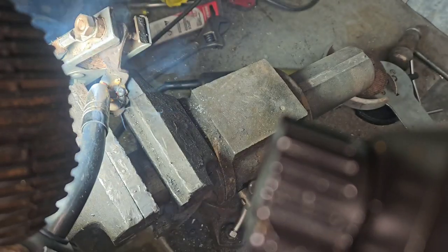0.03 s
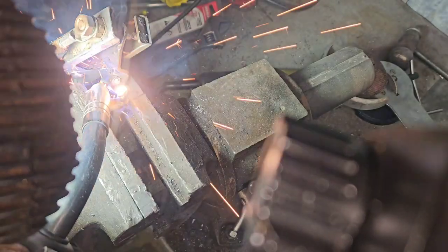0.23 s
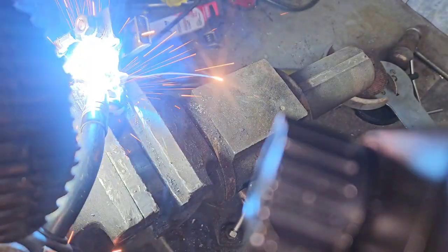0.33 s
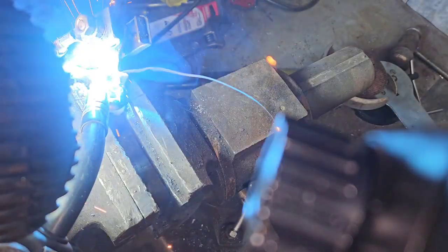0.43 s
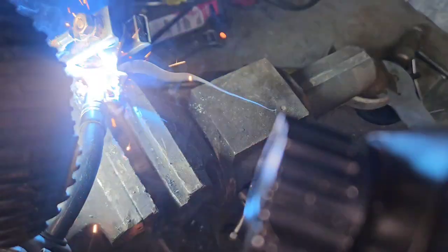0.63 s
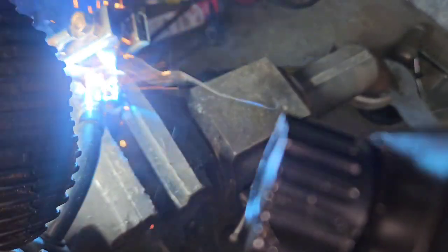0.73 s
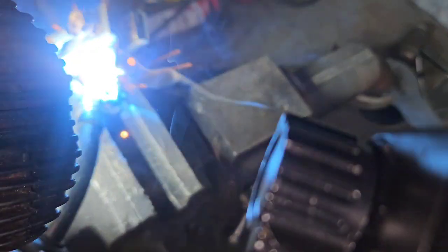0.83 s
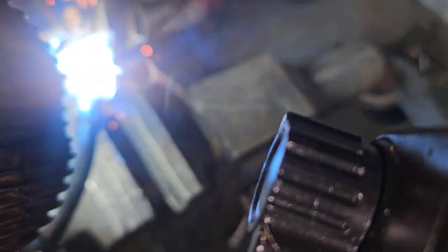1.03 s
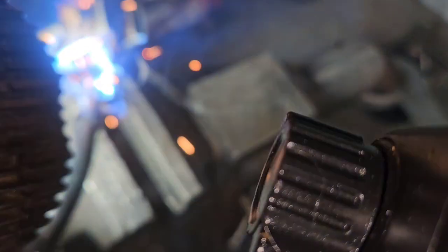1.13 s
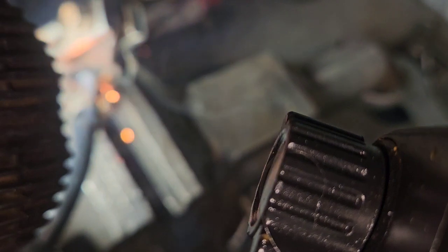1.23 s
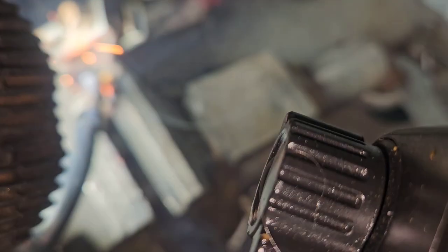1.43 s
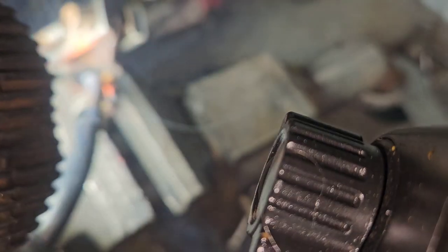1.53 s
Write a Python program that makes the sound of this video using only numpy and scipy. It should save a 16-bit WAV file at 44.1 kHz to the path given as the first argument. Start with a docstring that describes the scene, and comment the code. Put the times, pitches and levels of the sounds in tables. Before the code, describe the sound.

A short electric weld is heard close up, slightly to the left. A fan hums alone, then gas hisses and the arc strikes with sharp cracks at 0.2 seconds. From 0.3 seconds it holds a harsh, crackling buzz with sizzling metal and a few soft thumps on the microphone. Near 1.1 seconds it sputters out, and the gas keeps hissing over the fan.

```python
"""A short wire-feed weld on a metal workbench, microphone close in, the arc a little to the left.
A cooling fan runs alone, then shielding gas starts to hiss. At 0.2 s the arc strikes with stray cracks
and settles into a buzz, the wire shorting and burning back about a hundred times a second. Molten metal
sizzles between the pops, droplets knock, and the hardest bursts thump the microphone.
Near 1.1 s the arc sputters out, and the gas hisses on over the fan."""
import sys
import numpy as np
from scipy import signal
from scipy.fft import rfft, irfft
from scipy.io import wavfile
from scipy.ndimage import uniform_filter1d

SR = 44100
rng = np.random.default_rng(int(sys.argv[2]) if len(sys.argv) > 2 else 0)


def wav_record(signal):
    """Record a signal, one row per channel, as 16-bit PCM in the file named by sys.argv[1]."""
    frames = np.transpose(np.atleast_2d(signal))
    bounded = np.clip(frames, -1, 1)
    # unit amplitude maps onto the largest positive 16-bit level
    quanta = np.round(bounded * 32767).astype(np.int16)
    wavfile.write(sys.argv[1], SR, quanta)


N = 70560


def arc():
    """Each short circuit ends in a snap and a ragged spray of noise; steady pops add a puff of air."""
    # Stray cracks as the arc strikes and dies: t/s, level/dB, spray relative to the crack/dB
    cracks = [(0.2066, 1.5, 2.5), (0.2096, -12, 5), (0.2644, 1.5, 4.5), (.2876, -2.5, 11.5),
              (0.2949, 3, -6), (.3123, -1.5, 8), (.316, -5, -2), (0.3183, 0, 4), (1.0467, 1.5, -2),
              (1.0508, -3, -4), (1.0602, -1.5, -21), (1.0679, 3, -8), (1.0805, 2.5, 2), (1.0916, -0.5, -3),
              (1.103, -4, 7.5), (1.1216, -5, 2)]
    spray_db, spray_s, spray_low_hz = -4, 0.0014, 424
    puff_db, puff_s = -45, 0.0015
    pop_times, pop_db, puff_sizes = pops()
    crack_times, crack_db, extra_db = np.transpose(cracks)
    t = np.arange(N) / SR
    buzz = clicks(pop_times, amp(pop_db))
    snaps = buzz + clicks(crack_times, amp(crack_db))
    spray_starts = buzz + clicks(crack_times, amp(crack_db + extra_db))
    fade = np.exp(-t / spray_s)
    spray = convolve(spray_starts, fade / np.linalg.norm(fade))[0] * rng.standard_normal(N)
    spray = signal.lfilter(*signal.butter(1, spray_low_hz, "high", fs=SR), spray)
    puff_shape = (1 - t / puff_s) * np.exp(-t / puff_s)
    puffs = convolve(clicks(pop_times, puff_sizes), puff_shape)[0]
    return lag_treble(snaps + amp(spray_db) * spray) + amp(puff_db) * puffs


def pops():
    """Times, levels and puff sizes of the steady pops: one per short circuit, never quite regular."""
    # Wire shorting and burning back: t/s, rate/Hz
    pop_rate = [(0.3247, 123.4), (0.3552, 118.8), (0.4109, 90.5), (0.4956, 98.6), (0.533, 108.7),
                (0.6188, 99.2), (0.6503, 99.7), (0.6704, 105.0), (0.7355, 92.4), (0.8341, 90.2),
                (0.8717, 93.0), (0.9558, 88.7), (0.9759, 97.6), (1.044, 94.1)]
    # Strength of the pops: t/s, level/dB
    pop_level = [(.325, 0), (.39, 2.5), (.49, -.5), (.6, 1), (.7, -1.5), (.84, 0), (.89, 2.5), (.955, -1),
                 (.98, 2), (1.01, -4.5), (1.04, 1.5)]
    spread_db, jitter_s = 0.26, .00015
    when, rate = np.transpose(pop_rate)
    t = np.arange(when[0], when[-1], 1 / SR)
    cycles = np.cumsum(np.interp(t, when, rate)) / SR
    times = np.interp(np.arange(cycles[-1]), cycles, t)
    spread, jitter, puff_sizes = rng.standard_normal((200, 3))[:len(times)].T
    level_db = np.interp(times, *np.transpose(pop_level)) + spread_db * spread
    return times + jitter_s * jitter, level_db, puff_sizes


def lag_treble(x, lag_s=0.0002745, from_hz=5860):
    """The bright ring of a snap arrives just after its first push."""
    hz = np.fft.rfftfreq(N, 1 / SR)
    delay = lag_s * (1 - 1 / (1 + (hz / from_hz) ** 6))
    phase = 2 * np.pi * np.cumsum(delay) * SR / N
    return irfft(rfft(x) * np.exp(-1j * phase), N)


def knocks():
    """Larger droplets burst with a hollow knock, ringing for a cycle or two."""
    # Bursting droplets: t/s, level/dB, f/Hz, decay/s
    droplets = [(0.318, -26, 640, 0.0038), (0.4052, -9, 1540, 0.00035), (0.4174, -25, 250, 0.0014),
                (0.5288, -20, 600, 0.00077), (0.6055, -21, 510, 0.00091), (0.7566, -16, 1730, 0.00037),
                (0.89, -29, 1700, 0.00036), (1.1028, -13.5, 765, 0.00071)]
    out = np.zeros(N)
    for start, db, hz, decay in droplets:
        t = np.maximum(np.arange(N) / SR - start, 0)
        out += amp(db) * np.sin(2 * np.pi * hz * t) * np.exp(-t / decay)
    return out


def sizzle(bursts_per_s=14000, spread_db=2):
    """Thousands of tiny bursts a second from the molten pool and its sparks."""
    # Strength of the sizzle: t/s, level/dB
    pool_level = [(.186, -71), (.193, -38), (.205, -24), (.212, -25), (.25, -32.5), (.30, -25.5),
                  (.33, -25.5), (.45, -28.5), (.72, -30.5), (.855, -33), (.885, -26), (.97, -31.5),
                  (1.085, -29.5), (1.122, -37), (1.135, -63)]
    sizes = amp(spread_db * np.minimum(rng.exponential(1, N), 3))
    grains = sizes * rng.standard_normal(N) * (rng.random(N) < bursts_per_s / SR)
    return amp(curve(pool_level)) * grains / grains.std()


def thumps(damping=0.41):
    """A brief push of air on the microphone, followed by a slow rebound."""
    # The hardest bursts: t/s, left/dB, right/dB, push length/s, rebound f/Hz
    bursts = [(0.21, -34, -18.5, 0.0017, 30), (0.2284, -29, -30, 0.005, 22), (0.2957, -27, -35, .001, 50),
              (0.735, -39, -19.5, 0.00082, 55), (0.7582, -30, -16, 0.00052, 56),
              (0.7806, -35, -21, 0.00041, 55), (0.802, -36, -21, 0.001, 55),
              (0.8895, -38, -11.5, 0.00066, 54.5), (0.9011, -21, -25, 0.00055, 55),
              (1.0805, -17, -9, 0.00066, 55.4), (1.0942, -14.5, -21.5, 0.00036, 56),
              (1.103, -36, -1.5, 0.00042, 51.6)]
    out = np.zeros((2, N))
    for start, left_db, right_db, length, rebound_hz in bursts:
        age = np.maximum(np.arange(N) / SR - start, 0) / length
        push = 2 * age ** 2 * np.exp(-age)
        omega = 2 * np.pi * rebound_hz
        rebound = signal.bilinear([1, 0, 0], [1, 2 * damping * omega, omega ** 2], SR)
        out -= amp([[left_db], [right_db]]) * signal.lfilter(*rebound, push)
    return out


def workshop(room_db=-7, room_delay_s=0.0091):
    """From weld to microphone: direct sound, echoes off nearby metal, the room's tail, ringing parts."""
    # Reverberation of the workshop: f/Hz, T60/s
    room_t60 = [(100, 0.11), (1000, 0.11), (2200, 0.15), (5000, 0.34), (9000, 0.33), (13000, 0.25)]
    # Colour of all the echoes: f/Hz, level/dB
    echo_colour = [(60, 0), (400, -11), (1200, -10.5), (2000, 3), (4500, 2), (8500, -10.5), (13000, -3),
                   (16000, -17)]
    # Metal parts ringing with the pops: f/Hz, level/dB, T60/s
    parts = [(1530, -41.5, 0.063), (1846, -40, 0.08), (3186, -47, 0.059), (4760, -47.5, 0.043),
             (4870, -45, 0.046)]
    t = np.arange(SR // 2) / SR
    hz, frame_s, spectra = signal.stft(rng.standard_normal((2, len(t))), SR, nperseg=256)
    spectra *= np.exp(-np.log(1000) * frame_s / read(room_t60, hz)[:, None])
    tail = signal.istft(spectra, SR, nperseg=256)[1][:, :len(t)] * (t > room_delay_s)
    clamps = scatter(delay_s=.0003, fade_s=0.09, left_db=-7.5, right_db=-13.5)
    bench = scatter(delay_s=.0032, fade_s=0.02, left_db=-8, right_db=-8.5)
    echoes = clamps + bench + amp(room_db) * tail / np.linalg.norm(tail[0])
    echo_gain = amp(read(echo_colour, np.fft.rfftfreq(len(t), 1 / SR)))
    path = irfft(rfft(echoes) * echo_gain, len(t))
    path[:, 0] += 1  # direct sound
    for f, db, t60 in parts:
        path += amp(db) * np.exp(-np.log(1000) * t / t60) * np.cos(2 * np.pi * f * t)
    return path


def scatter(delay_s, fade_s, left_db, right_db):
    """A dense cluster of early echoes off metal near the weld."""
    t = np.arange(SR // 2) / SR - delay_s
    taps = rng.choice([-1., 1.], (2, len(t))) * (t > 0) * np.exp(-abs(t) / fade_s)
    return amp([[left_db], [right_db]]) * taps / np.linalg.norm(taps, axis=1, keepdims=True)


def gas(start_s=0.173, rise_s=0.023):
    """Shielding gas leaves the nozzle just before the strike and keeps flowing after the arc."""
    # Hiss of the nozzle: f/Hz, left/dB, right/dB
    hiss_colour = [(500, -64, -64), (1310, -49, -53), (1950, -36, -34), (2500, -46, -46.5),
                   (4600, -45.5, -41.5), (5140, -37, -43), (6300, -36, -47), (7540, -37.5, -46),
                   (8800, -37, -47), (9400, -51, -66), (12100, -49, -53), (13600, -39, -43),
                   (15500, -46, -50)]
    flow = np.clip((np.arange(N) / SR - start_s) / rise_s, 0, 1)
    return colour(rng.standard_normal((2, N)), hiss_colour) * flow


def fan(waver_depth=0.0058, mono_below_hz=680):
    """The cooling fan behind it all: rushing air, centred in the bass, and a few wavering tones."""
    # Rush of air: f/Hz, left/dB, right/dB
    air_colour = [(19.8, -56, -17), (60, -26.5, -24.5), (131, -32.5, -28), (240, -23, -25.5),
                  (432, -31.5, -32), (558, -24.5, -23), (694, -36, -40.5), (1170, -39.5, -39),
                  (2500, -47, -47), (4800, -52, -46.5), (5700, -59, -59), (8360, -54, -68),
                  (9800, -94, -84), (13000, -75, -67), (16000, -86, -68)]
    # Hum of the fan: f/Hz, level/dB
    tones = [(91.5, -54), (215.3, -52.5), (463, -55), (511.4, -48.5)]
    # A little quieter from the strike onwards: t/s, level/dB
    fan_level = [(.19, 0.5), (.22, -3.5)]
    left, unrelated = rfft(rng.standard_normal((2, N)))
    coherence = 1 / (1 + (np.fft.rfftfreq(N, 1 / SR) / mono_below_hz) ** 2)
    right = coherence * left + np.sqrt(1 - coherence ** 2) * unrelated
    air = colour(irfft([left, right], N), air_colour)
    waver = uniform_filter1d(rng.standard_normal(N), size=3000)
    clock = np.cumsum(1 + waver_depth * waver / waver.std()) / SR
    hum = sum(np.sqrt(2) * amp(db) * np.sin(2 * np.pi * (hz * clock + rng.random())) for hz, db in tones)
    return amp(curve(fan_level)) * (air + hum)


def amp(db):
    """Decibels to gain."""
    return 10 ** (np.asarray(db) / 20)


def curve(points):
    """A control curve at every sample."""
    return np.interp(np.arange(N) / SR, *np.transpose(points))


def read(points, hz, column=1):
    """One column of a spectrum table on a log-frequency axis."""
    table = np.transpose(points)
    return np.interp(np.log(hz + 1), np.log(table[0]), table[column])


def clicks(times, sizes):
    """A train of single-sample clicks."""
    return np.bincount(np.round(times * SR).astype(int), sizes, N)[:N]


def convolve(x, response):
    """Convolution along time, cut to the scene's length."""
    return signal.fftconvolve(np.atleast_2d(x), np.atleast_2d(response), axes=1)[:, :N]


def colour(x, table):
    """Minimum-phase filter with a left and a right spectrum."""
    hz = abs(np.fft.fftfreq(4096, 1 / SR))
    log_gain = np.log(amp([read(table, hz, column=1), read(table, hz, column=2)]))
    spectrum = np.exp(np.conj(signal.hilbert(log_gain)))
    return convolve(x, np.fft.ifft(spectrum).real)


def scene():
    """Close to the bench; the arc lies a little to the left, so it reaches the right channel later."""
    # Colour of one snap at the microphone: f/Hz, left/dB, right/dB
    snap_colour = [(25, -22.5, -21), (86, 8.5, 9), (210, 10, 8), (475, 1, -1.5), (585, 2.5, 8),
                   (1170, 5, 0), (1900, 0, 3), (2400, -7, 3), (3570, 1, 1.5), (4900, -6.5, 3),
                   (5330, 5, -6.5), (7020, 4.5, 0.5), (7140, 12, 5), (8670, 13.5, 8), (9650, 3, -23),
                   (11280, -4.5, -19), (11260, 7.5, 0.5), (13400, 11, 7), (15500, 7.5, -1),
                   (15700, -6.5, -9)]
    # Colour of the sizzle at the microphone: f/Hz, left/dB, right/dB
    sizzle_colour = [(100, -2, -2.5), (600, -6, -6), (1900, -2, 3), (2600, -0.5, -1), (4500, -1, 7),
                     (5770, -4, 1.5), (6660, -3, 2), (7500, 0, 4), (8700, 9.5, 7), (9570, -5.5, -4),
                     (11300, -2, -9), (11420, 4, 8), (12900, 9, 15), (15100, -2.5, -7)]
    right_lag_s = .00021
    path = workshop()
    crackle = colour(convolve(arc() + knocks(), path), snap_colour)
    pool = colour(convolve(sizzle(), path), sizzle_colour)
    left, right = crackle + pool
    weld = np.array([left, np.roll(right, round(right_lag_s * SR))])
    return weld + thumps() + gas() + fan()


def record(dry):
    """The tallest peaks are rounded off, then the highest treble is cut."""
    ceiling, edge_hz = .85, 16100
    rounded = dry / (1 + (dry / ceiling) ** 6) ** (1 / 6)
    low_pass = signal.firwin(401, edge_hz, window=("kaiser", 8), fs=SR)
    return signal.oaconvolve(rounded, low_pass[None], "same")


dry = scene()
out = record(dry)
wav_record(out)
```